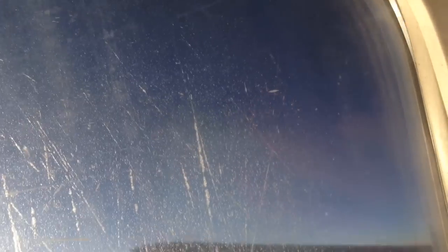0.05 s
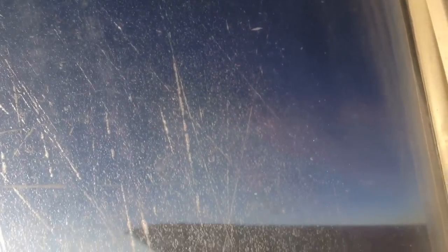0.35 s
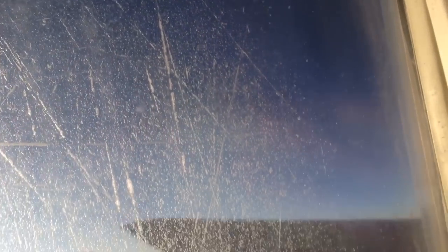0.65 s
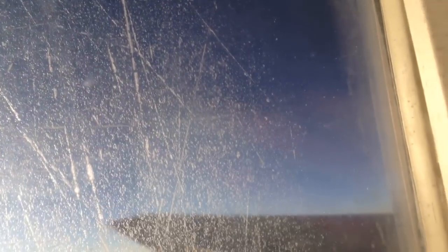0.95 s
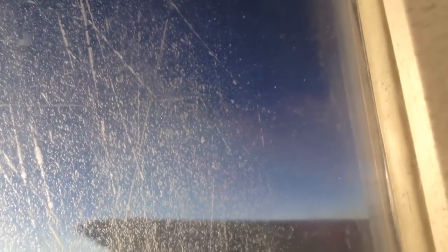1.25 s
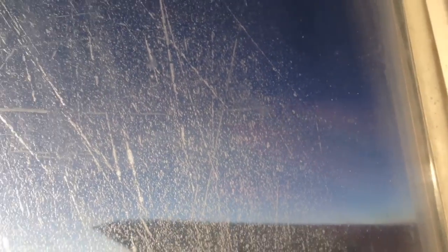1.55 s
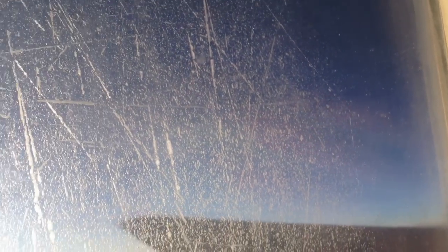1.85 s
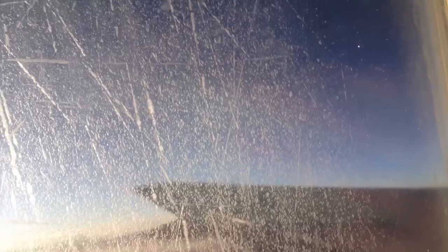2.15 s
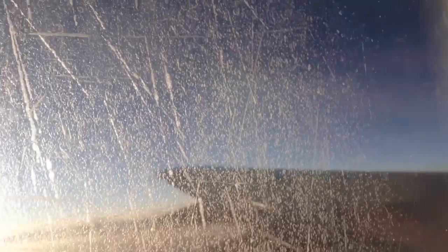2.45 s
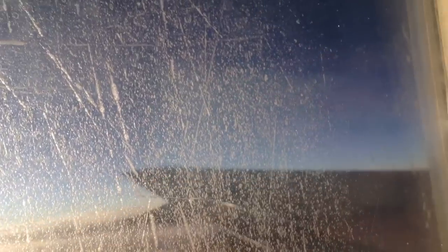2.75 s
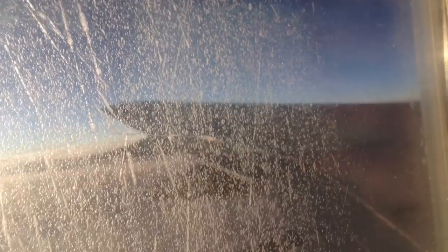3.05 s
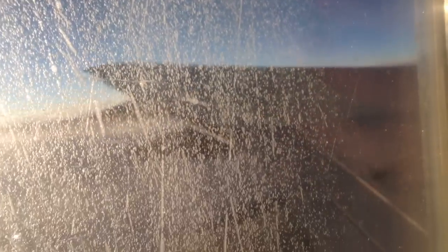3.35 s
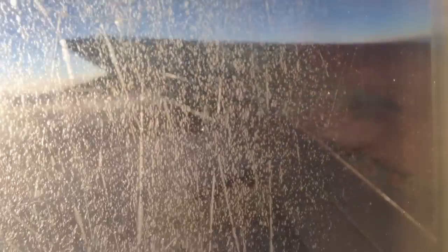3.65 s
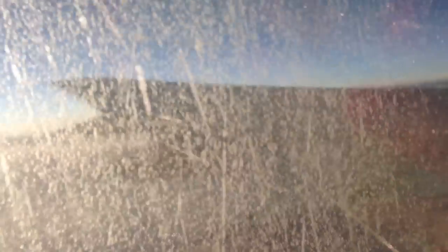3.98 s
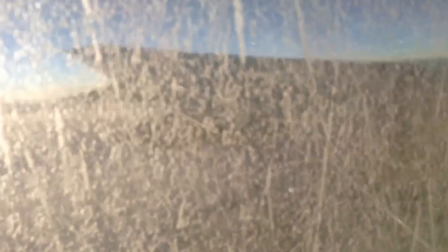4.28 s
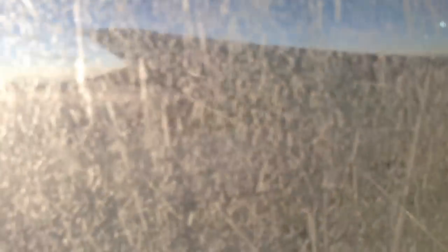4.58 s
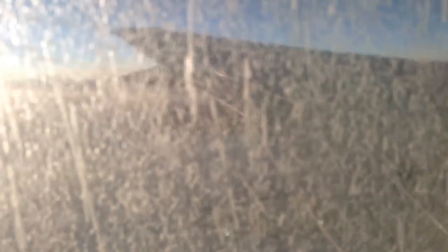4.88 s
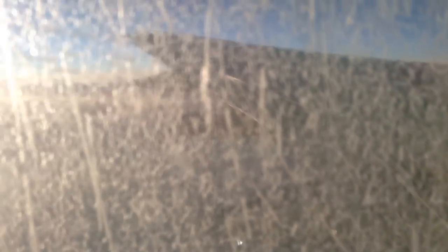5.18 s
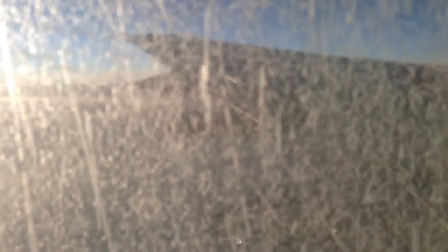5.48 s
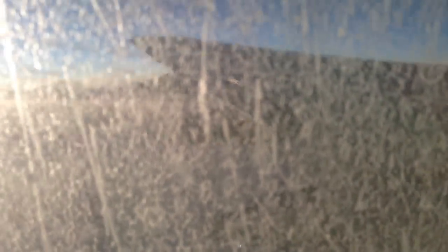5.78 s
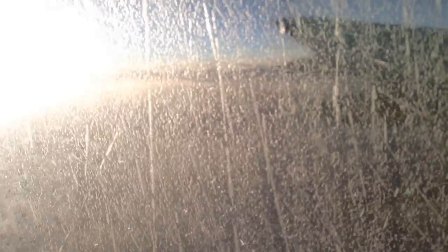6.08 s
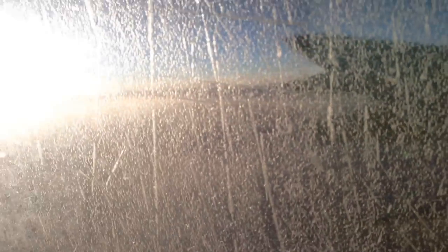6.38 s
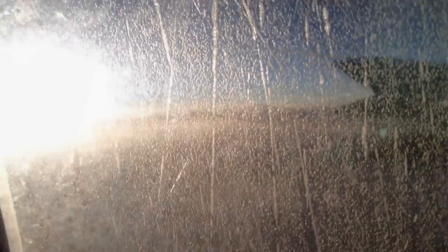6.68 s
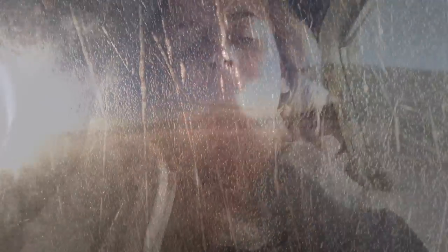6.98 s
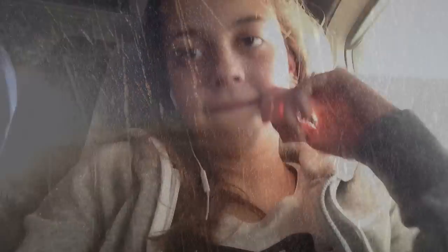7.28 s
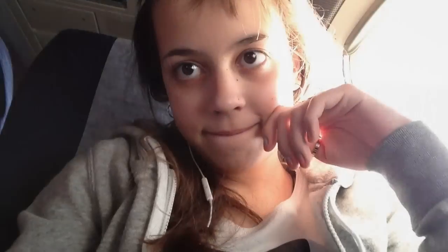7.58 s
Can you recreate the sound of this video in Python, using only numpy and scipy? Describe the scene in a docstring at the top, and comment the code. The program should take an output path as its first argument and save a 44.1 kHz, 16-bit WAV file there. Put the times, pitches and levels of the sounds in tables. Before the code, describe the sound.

Steady deep rumble of jet engines and rushing air inside an airliner cabin, with a low hum and faint high whine.

```python
"""Window seat in a cruising airliner

Turbulent air drums on the fuselage and booms in the cabin. The engine fans hum, the two cores whine
a few hertz apart, and air hisses at the window and from the vents. The microphone leans in to the pane,
ticks in the hand, and at the end turns away from the wall into the cabin."""
import sys
import numpy as np
from scipy import signal
from scipy.fft import rfft, irfft, next_fast_len
from scipy.io import wavfile
from scipy.ndimage import uniform_filter1d, minimum_filter1d

SR = 44100
rng = np.random.default_rng(int(sys.argv[2]) if len(sys.argv) > 2 else 0)


def to_wav(s):
    """Save 16-bit WAV."""
    ch = np.atleast_2d(s).T  # columns
    pcm = np.round(np.clip(ch, -1, 1) * 32767)  # PCM
    wavfile.write(sys.argv[1], SR, pcm.astype(np.int16))


N = 336483
TIME = np.arange(N) / SR
FAN_HZ, FIRST_SHAFT_HZ, SECOND_SHAFT_HZ = 62.4, 887.8, 891.7
TURN_START_S, TURN_LENGTH_S = 6.9, 0.61

# Tone colour of each air layer. Each row: frequency in Hz, relative spectral level in dB.
WALL_SPECTRUM = [(10, -26.5), (22, -19.5), (45, -13), (75, -6.5), (105, -6), (135, 2), (190, 0.5),
                 (240, -4.5), (300, -5), (370, -4), (415, -8.5), (470, -20.5), (650, -37.5), (1300, -56.5)]  # deep rumble
SKIN_SPECTRUM = [(700, -7), (900, -7), (1020, 1.5), (1280, -8.5), (1420, -6), (1600, -17), (2500, -30.5)]  # rush along the outer skin
TRIM_SPECTRUM = [(250, -8), (470, 2.5), (545, 1), (595, 1), (640, -10), (900, -18), (1150, -28),
                 (2000, -44)]  # midrange roar
CAVITY_SPECTRUM = [(550, -13.5), (690, -2), (800, -2), (850, -8), (900, -14.5), (1100, -20.5), (1500, -31)]  # hollow note between the panes
PANE_SPECTRUM = [(700, -0.5), (1020, 2.5), (1280, 1), (1570, 1), (2000, 1.5), (2550, -3.5), (3000, -11),
                 (4200, -10.5), (5500, -15.5), (8000, -29), (15000, -45.5)]  # soft hiss
VENT_SPECTRUM = [(2000, 2.5), (3200, 7), (4700, 4.5), (7000, 4.5), (8300, 2), (10500, -1.5), (15000, -5.5)]  # bright hiss
# Resonances that ring in those layers. Each row: centre in Hz, width in Hz, lift in dB.
CABIN_MODES = [(165.4, 14, 3), (268, 37, 3), (330.1, 22, 6.5)]
SKIN_MODES = [(1360, 50, 4)]
CAVITY_MODES = [(757, 13, 3.7)]
PANE_MODES = [(2630, 83, 1.4)]
NOZZLE_MODES = [(4680, 350, 4), (6900, 400, 2)]
# How each layer reaches the microphone. Each holds: base rms level in dB, share of the wall's swing,
# gain at the pane in dB, gain facing the cabin in dB.
WALL_REACH = (-11, 1, 0.5, -1.5)
SKIN_REACH = (-46, 0.4, 1.3, -7.5)
TRIM_REACH = (-32, 0.85, 0.5, 5)
PANE_REACH = (-48, 0, 5, -4.5)
VENT_REACH = (-58.5, 0, -3.5, 7.5)
HUM_REACH = (-21, 0.56, -0.9, -5.5)
# Whine of each core. Each row: multiple of the shaft rate, base rms level in dB, gain at the pane in dB.
FIRST_CORE_PARTIALS = [(1, -55.5, -3.5), (2, -66, 12), (3, -76, 13.5), (4, -72, -2), (6, -73, 0.5),
                       (7, -81.5, 3.5)]
SECOND_CORE_PARTIALS = [(2, -71.5, 10.5), (4, -74.5, -3.5), (5, -77, 1)]
# Swing of the wall's sound at the microphone, and of the hiss. Each row: time in seconds, gain in dB.
WALL_SWING = [(0, 0), (.3, 0.56), (1.5, 1.1), (2.8, -1.8), (3.3, -0.05), (5.5, -0.3), (6.6, 0.5), (7.4, -7),
              (7.63, -5)]
HISS_SWING = [(1.8, 0), (2.2, -1.8), (3.8, -1.8), (6.8, -3.5)]
# Swells of the hollow note and the blade whistle. Each row: time in seconds, base rms level in dB.
CAVITY_SWELLS = [(0, -38.5), (1.3, -35), (2.2, -38.5), (3.6, -35.5), (5.2, -44.5), (6.6, -39),
                 (7.63, -41.8)]
WHISTLE_SWELLS = [(.5, -70), (1.35, -60), (1.9, -69.5), (3.1, -64), (3.8, -64.5), (4.35, -76),
                  (4.85, -67.5), (6.4, -68.5), (7, -76.5), (7.5, -70)]
# The microphone leans in to the pane and pulls back. Each row: time in seconds, nearness from 0 to 1.
PANE_NEARNESS = [(3.7, 0), (4.6, 0.75), (5.5, 1), (5.92, 0.7), (6.0, 0.1), (6.8, .1), (7.2, 0)]
# Small handling ticks. Each row: start in seconds, gain in dB.
HANDLING_TICKS = [(5.076, -54), (5.954, -39)]
# Ring of the microphone casing. Each row: pitch in Hz, relative level in dB, 60 dB decay in seconds.
CASING_MODES = [(3900, -10, .02), (4900, 0, .012), (5650, -5, .014), (6500, -8, .014), (11500, -10, .009)]


def airflow():
    """The bed: turbulent air shakes wall, skin, trim, window cavity and pane; the vents hiss on top."""
    buffet = drift(11.0)  # eddies swell all the outside noise together
    hiss_db = automation(HISS_SWING)
    wall = from_db(heard_db(WALL_REACH) + 0.072 * buffet) * turbulence(WALL_SPECTRUM, CABIN_MODES)
    skin = from_db(heard_db(SKIN_REACH) + 0.3 * buffet) * turbulence(SKIN_SPECTRUM, SKIN_MODES)
    trim = from_db(heard_db(TRIM_REACH) + 0.52 * buffet) * turbulence(TRIM_SPECTRUM)
    cavity_db = automation(CAVITY_SWELLS) + 0.27 * buffet
    cavity = from_db(cavity_db) * turbulence(CAVITY_SPECTRUM, CAVITY_MODES)
    pane_db = heard_db(PANE_REACH) + hiss_db + 1.1 * buffet
    pane = from_db(pane_db) * turbulence(PANE_SPECTRUM, PANE_MODES)
    vent_db = heard_db(VENT_REACH) + hiss_db + 0.35 * drift(7.0)
    vents = from_db(vent_db) * turbulence(VENT_SPECTRUM, NOZZLE_MODES)
    return wall + skin + trim + cavity + pane + vents


def fan_hum(waver_db=1.5):
    """Fan imbalance comes through the wall as one deep, slightly unsteady tone."""
    angle = shaft_angle(FAN_HZ, wander_hz=0.25, rate_hz=1.1)
    return tone(angle, heard_db(HUM_REACH) + waver_db * drift(6.7))


def core_whine(shaft_hz, partials):
    """A spinning core sings in harmonics, each fading in and out in the cabin's standing waves."""
    angle = shaft_angle(shaft_hz, wander_hz=0.25, rate_hz=2.5)
    wall_db, nearness = automation(WALL_SWING), automation(PANE_NEARNESS)
    whine = np.zeros(N)
    for multiple, base_db, pane_db in partials:
        fading_db = 2.5 * drift(2.5)
        whine += tone(multiple * angle, base_db + wall_db + pane_db * nearness + fading_db)
    return whine


def blade_whistle(flutter_db=1.4):
    """A thin, fluttering line at five times the shaft rate swells and fades as the microphone moves."""
    angle = 5 * shaft_angle(FIRST_SHAFT_HZ, wander_hz=0.22, rate_hz=2.5)
    return tone(angle, automation(WHISTLE_SWELLS) + flutter_db * drift(6.0))


def handling_ticks(crack_db=-3, crack_t60_s=0.007):
    """A brief, bright crack of contact rings the damped modes of the casing."""
    ticks = np.zeros(N)
    age = np.arange(SR // 10) / SR
    bright_band = signal.butter(4, [3800, 12500], "band", fs=SR, output="sos")
    ring = sum(from_db(db - 60 * age / t60) * np.sin(2 * np.pi * hz * age)
               for hz, db, t60 in CASING_MODES)
    for start_s, tick_db in HANDLING_TICKS:
        burst = rng.standard_normal(len(age)) * from_db(-60 * age / crack_t60_s)
        crack = from_db(crack_db) * signal.sosfilt(bright_band, burst)
        start = round(start_s * SR)
        ticks[start:start + len(age)] += from_db(tick_db) * (ring + crack)
    return ticks


def turbulence(spectrum, modes=()):
    """Random air pressure with a smooth tone colour, lifted at each resonance; rms 1."""
    size = next_fast_len(N)
    white = rfft(rng.standard_normal(size))
    hz = np.maximum(np.arange(len(white)) * SR / size, 1)
    points_hz, points_db = np.transpose(spectrum)
    gain = from_db(np.interp(np.log(hz), np.log(points_hz), points_db))
    gain *= np.minimum(hz / points_hz[0], 1) * np.minimum(points_hz[-1] / hz, 1) ** 2  # ends roll off
    for centre_hz, width_hz, lift_db in modes:
        gain *= 1 + (from_db(lift_db) - 1) / (1 + (2 * (hz - centre_hz) / width_hz) ** 2)
    return unit_rms(irfft(white * gain, size)[:N])


def heard_db(reach):
    """A layer's level as the microphone moves along the wall, nears the pane and turns to the cabin."""
    base_db, wall_share, pane_db, cabin_db = reach
    wall_db, nearness = automation(WALL_SWING), automation(PANE_NEARNESS)
    turned = np.clip((TIME - TURN_START_S) / TURN_LENGTH_S, 0, 1)
    return base_db + wall_share * wall_db + pane_db * nearness + cabin_db * turned


def shaft_angle(hz, wander_hz, rate_hz):
    """Phase of a governed shaft whose speed wanders slightly."""
    speed_hz = hz + wander_hz * drift(rate_hz)
    return 2 * np.pi * (np.cumsum(speed_hz) / SR + rng.random())


def drift(rate_hz):
    """Random wobble with rms 1, mostly slower than rate_hz."""
    hz = np.arange(N + 1) * SR / (2 * N)
    white = rfft(rng.standard_normal(2 * N))
    return unit_rms(irfft(white / (1 + (hz / rate_hz) ** 2))[:N])


def tone(angle, rms_db):
    """A pure sine at the given level."""
    return np.sqrt(2) * from_db(rms_db) * np.sin(angle)


def automation(points):
    """Straight ramps between (seconds, value) points."""
    return np.interp(TIME, *np.transpose(points))


def from_db(db):
    """Decibels to gain."""
    return 10 ** (np.asarray(db) / 20)


def unit_rms(x):
    """Scale to rms 1."""
    return x / np.sqrt(np.mean(x ** 2) + 1e-20)


def scene():
    """Air, engines and handling in one mono mix."""
    first_core = core_whine(FIRST_SHAFT_HZ, FIRST_CORE_PARTIALS)
    second_core = core_whine(SECOND_SHAFT_HZ, SECOND_CORE_PARTIALS)
    engines = fan_hum() + first_core + second_core + blade_whistle()
    return (airflow() + engines + handling_ticks())[None]


def record(dry, ceiling=0.99, fade_in_s=0.003, cutoff_hz=15400):
    """A smooth limiter holds the tallest swells, a tiny fade opens the sound, and the top is cut."""
    window = SR // 200  # 5 ms
    needed_gain = np.minimum(1, ceiling / (np.abs(dry) + 1e-9))
    held_gain = minimum_filter1d(needed_gain, 2 * window)
    smooth_gain = uniform_filter1d(uniform_filter1d(held_gain, window), window)
    fade_in = np.minimum(TIME / fade_in_s, 1)
    high_cut = signal.ellip(12, 0.1, 80, cutoff_hz, fs=SR, output="sos")
    return signal.sosfilt(high_cut, dry * smooth_gain * fade_in)


dry = scene()
out = record(dry)
to_wav(out)
```